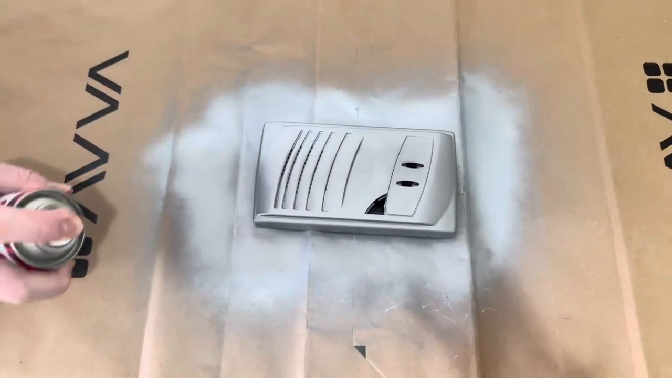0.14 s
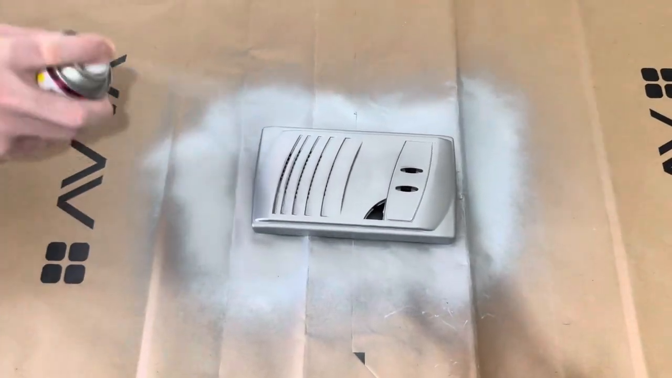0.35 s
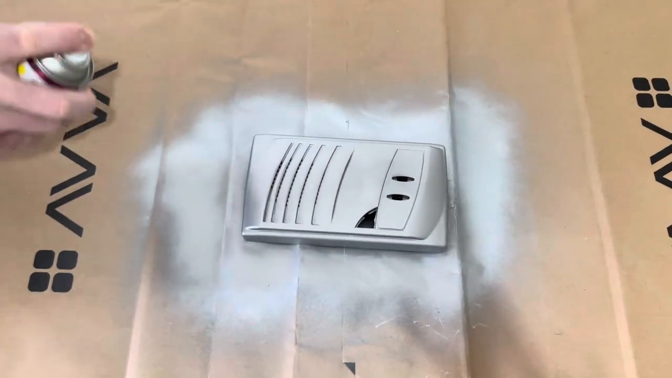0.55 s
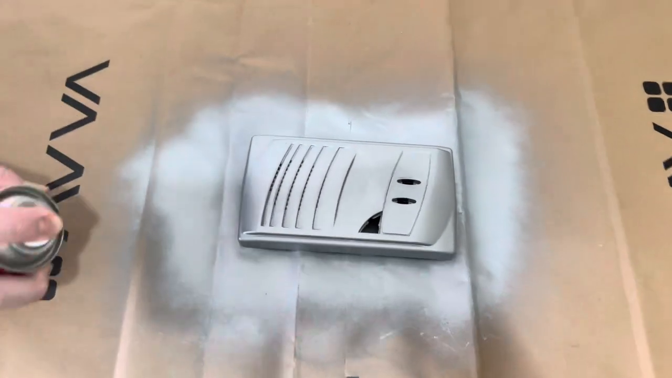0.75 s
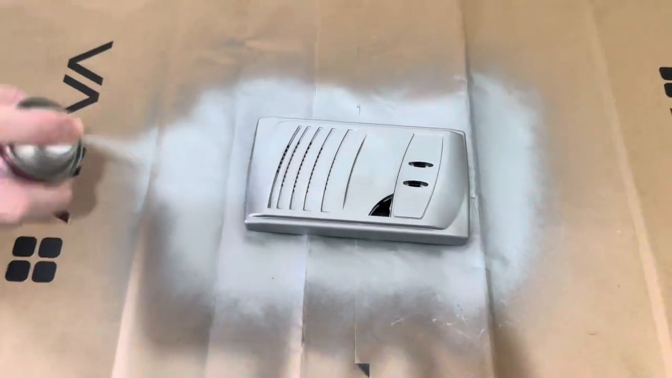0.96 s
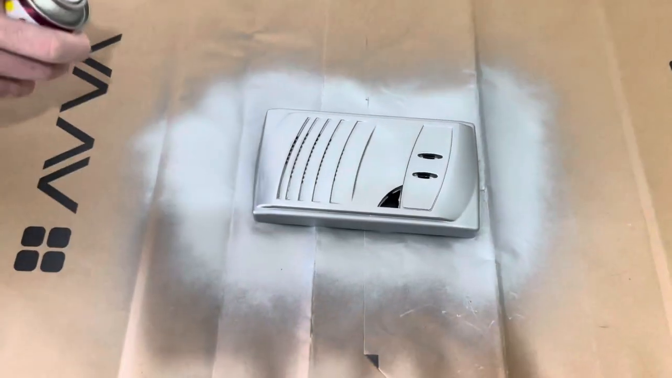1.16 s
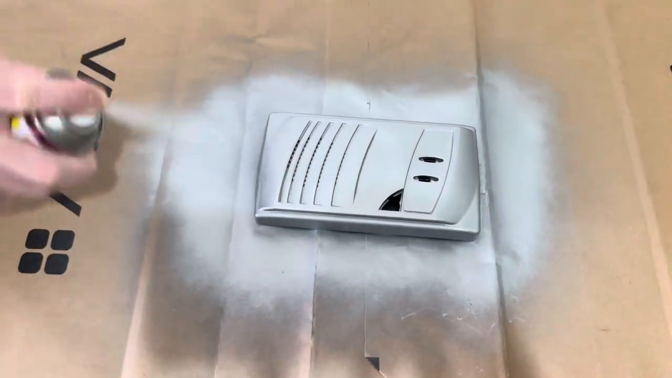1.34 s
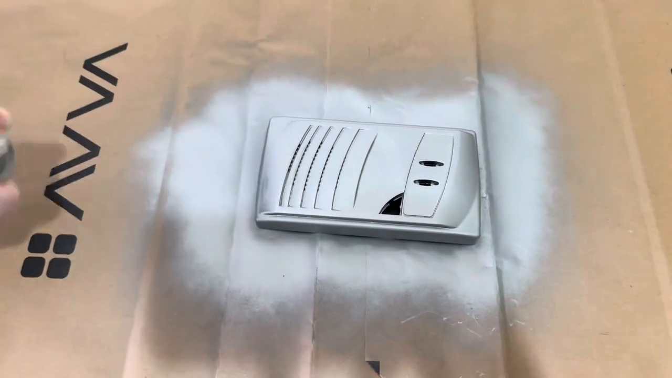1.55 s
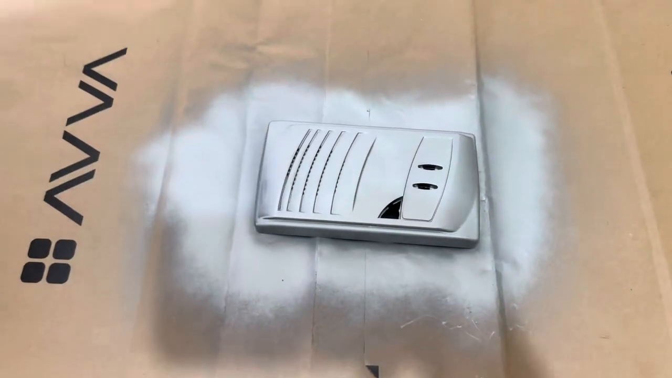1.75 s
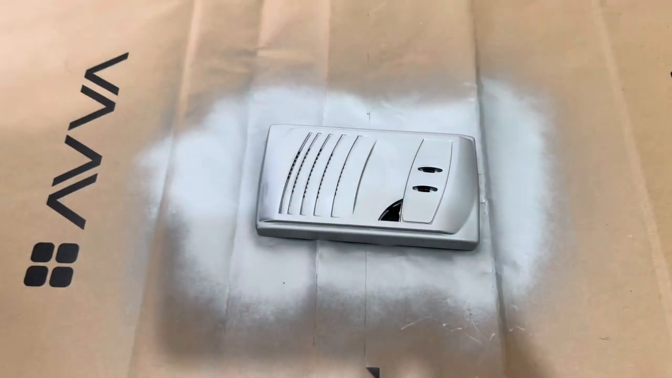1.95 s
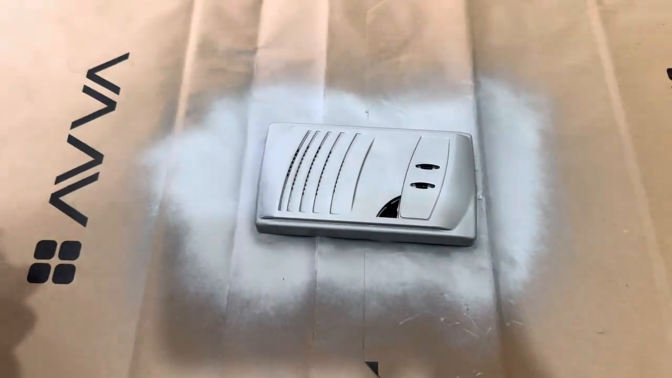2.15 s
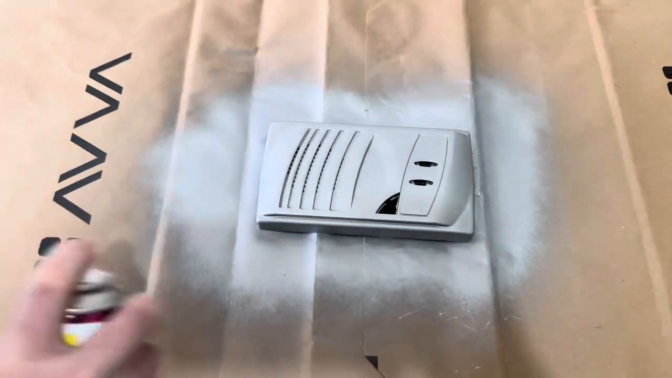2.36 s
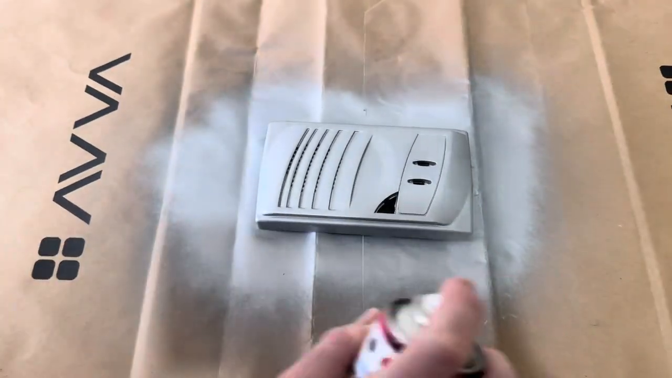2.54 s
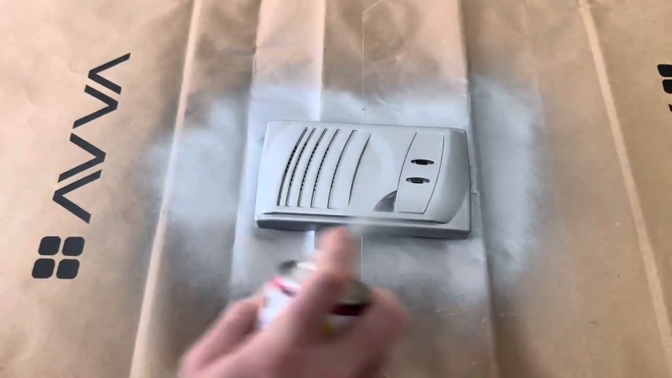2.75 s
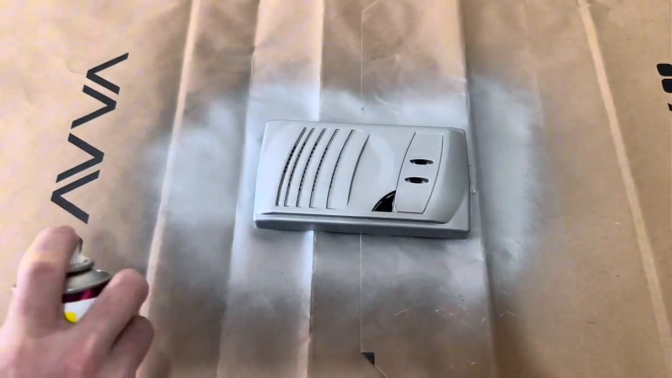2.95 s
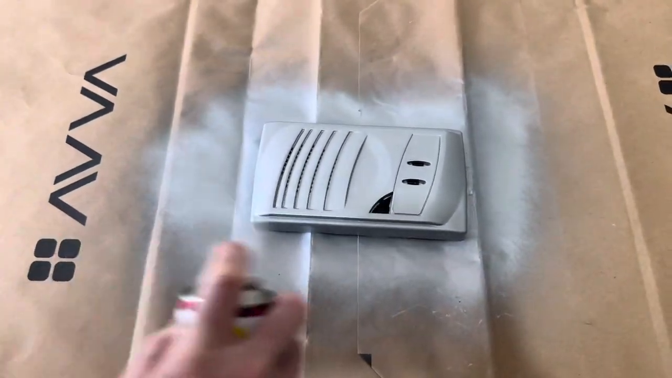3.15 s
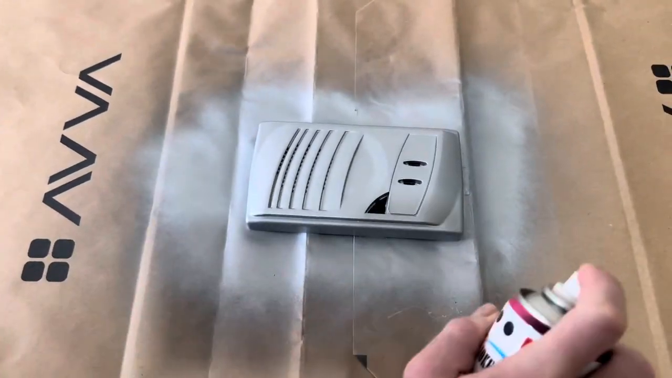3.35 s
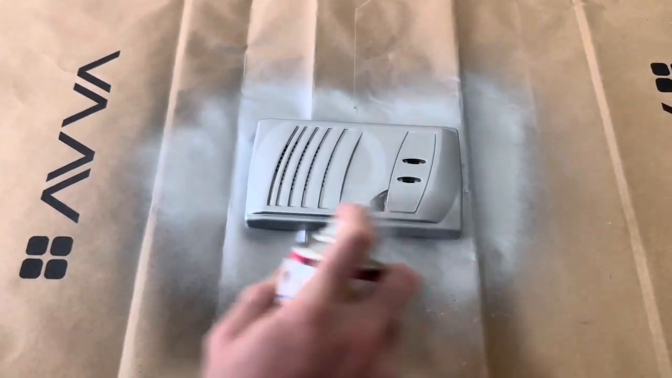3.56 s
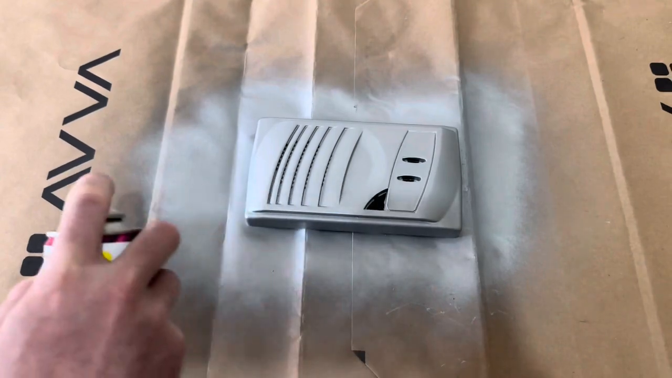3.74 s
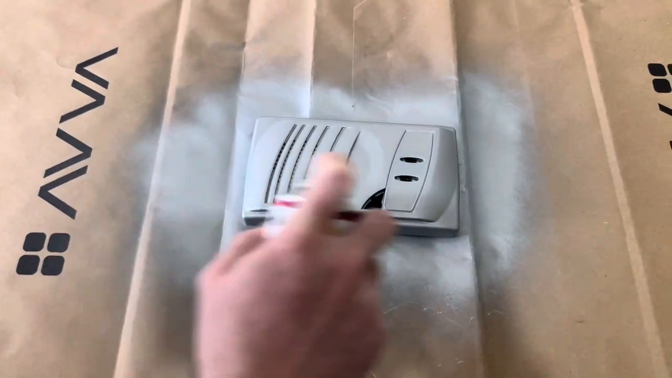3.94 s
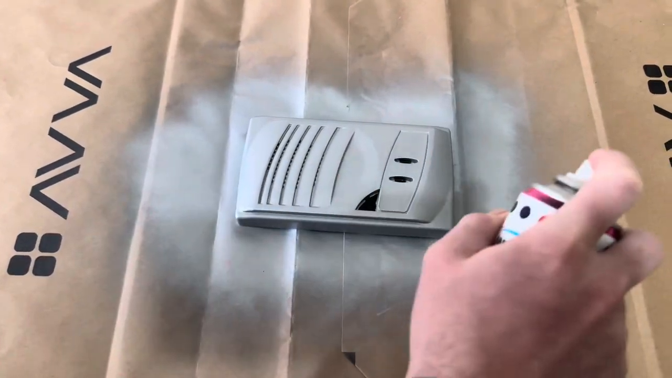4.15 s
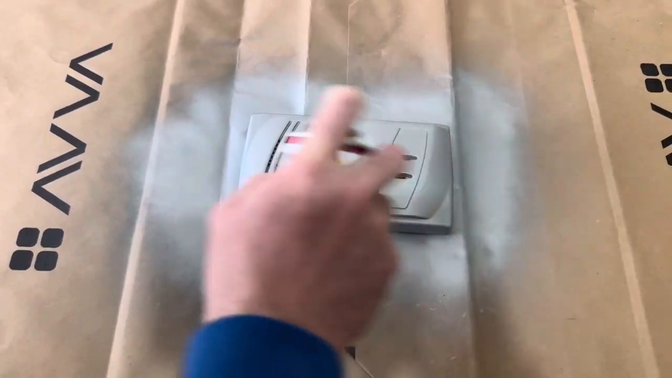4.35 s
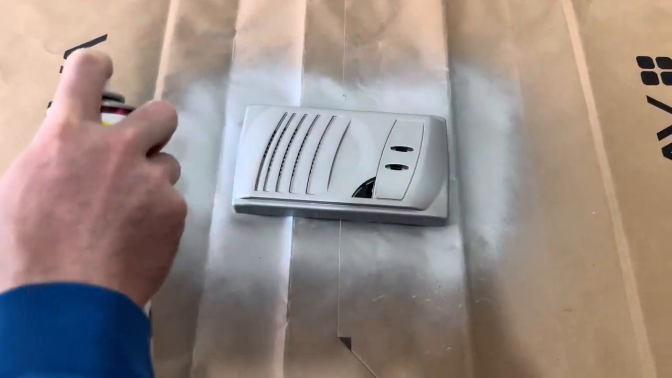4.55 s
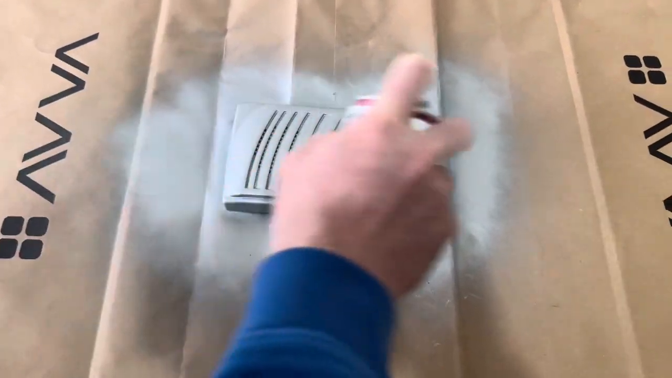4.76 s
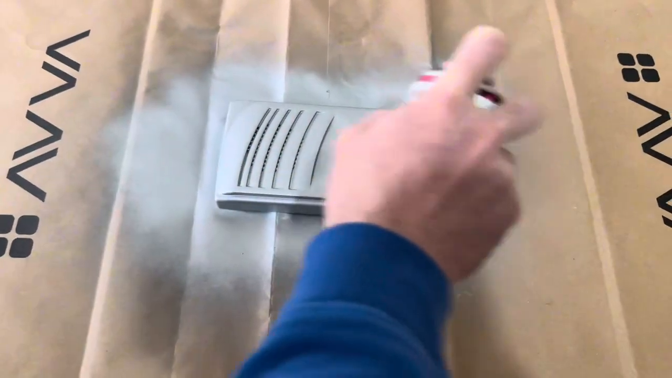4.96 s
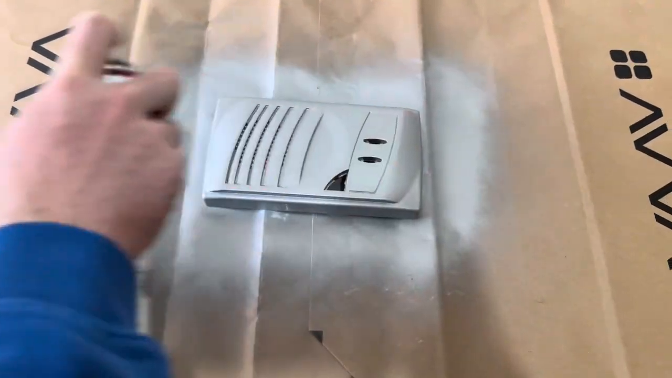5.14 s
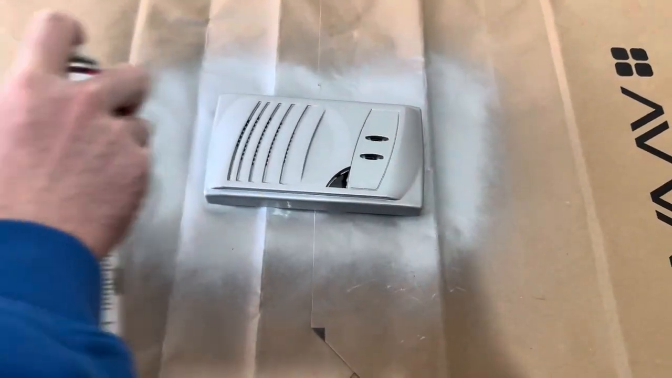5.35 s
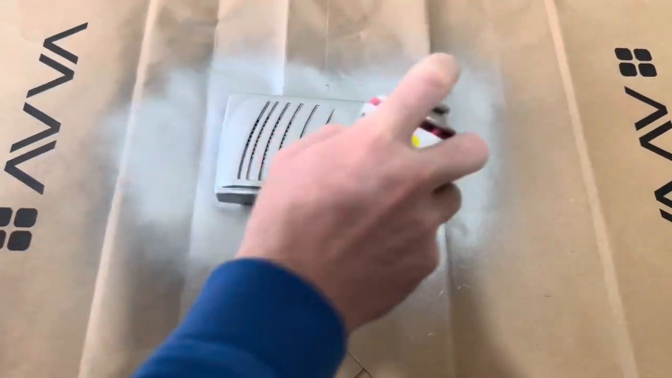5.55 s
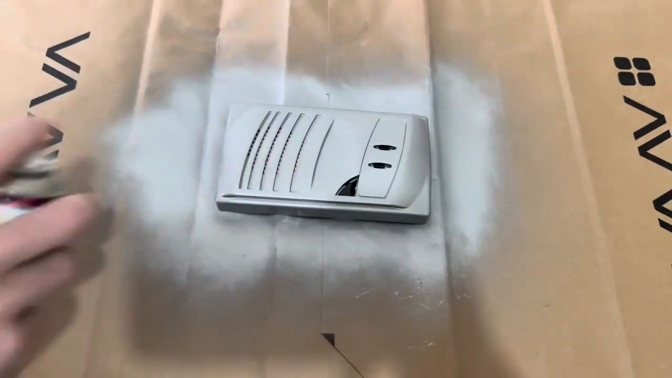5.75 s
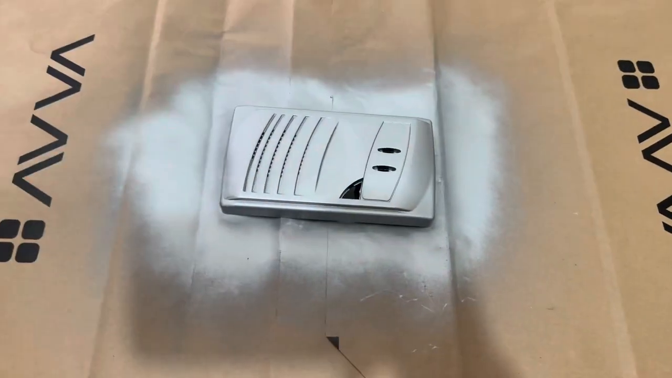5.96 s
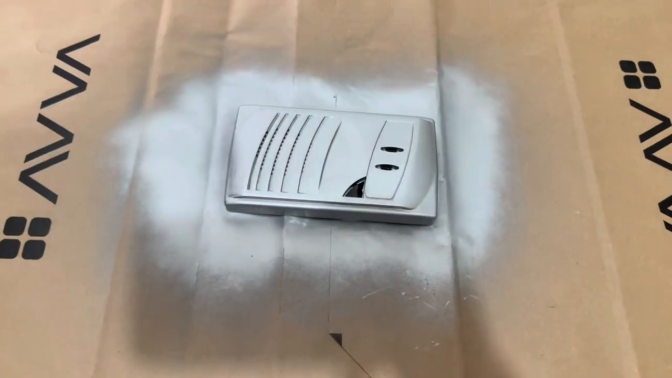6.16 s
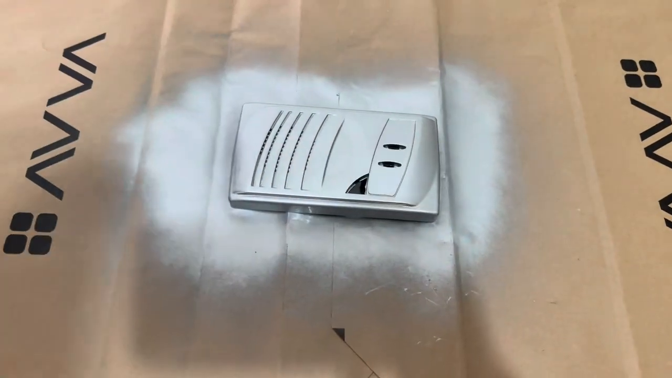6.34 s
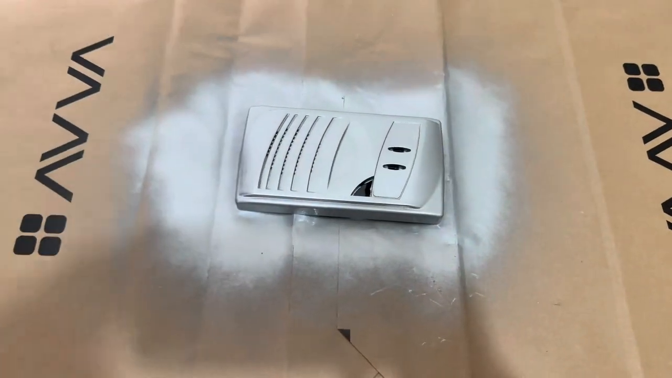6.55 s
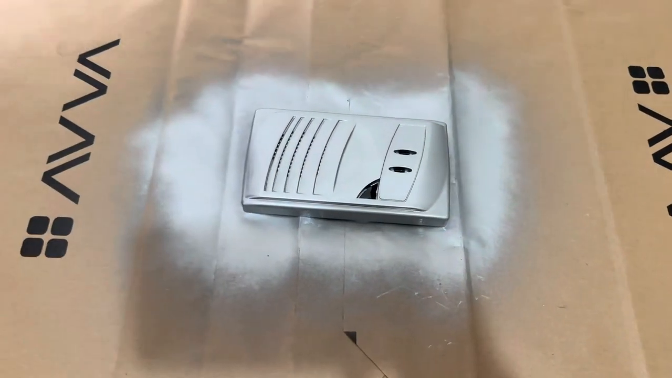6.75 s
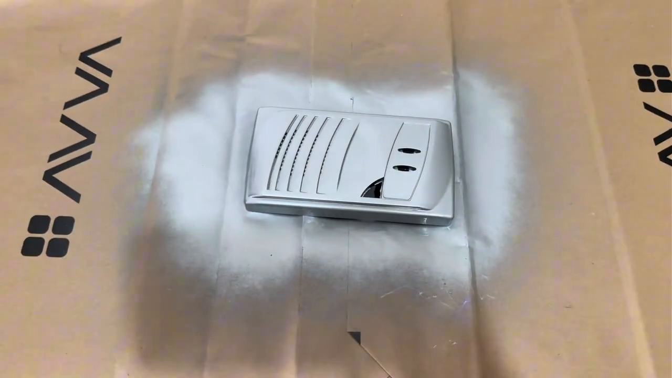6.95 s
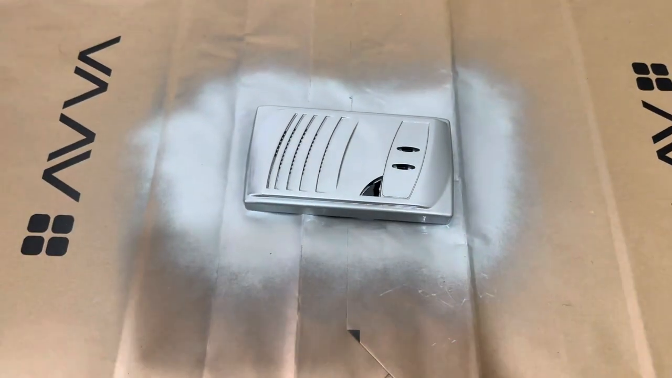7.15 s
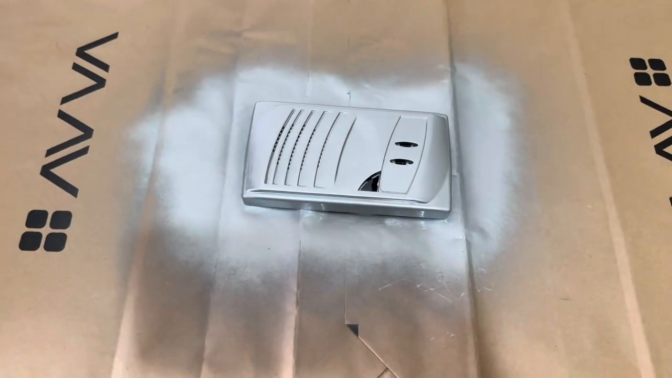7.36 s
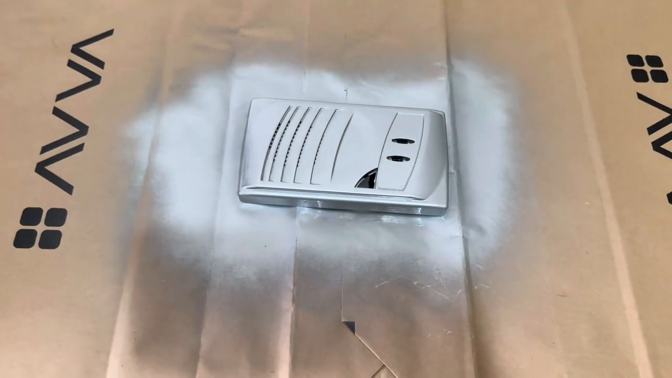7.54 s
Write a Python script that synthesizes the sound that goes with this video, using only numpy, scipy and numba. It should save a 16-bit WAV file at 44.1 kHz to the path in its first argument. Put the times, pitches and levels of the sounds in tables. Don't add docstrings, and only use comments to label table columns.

```python
import sys
import numpy as np
from scipy import signal
from scipy.fft import rfft, irfft, next_fast_len
from scipy.io import wavfile
from scipy.ndimage import uniform_filter1d, map_coordinates
from numba import njit

SR = 44100
rng = np.random.default_rng(int(sys.argv[2]) if len(sys.argv) > 2 else 0)


def attenuation_scalar(level_db):
    decades = np.asarray(level_db, float) / 20
    return 10 ** decades


def dump_mix(stems):
    frames = np.atleast_2d(stems).T
    limited = np.clip(frames, -1, 1)
    pcm = np.round(limited * 32767).astype(np.int16)
    wavfile.write(sys.argv[1], SR, pcm)


N = 335160

# f/Hz, level/dB
AIR_COLOUR = [(88, -46), (150, -16), (375, -12), (397, -32), (483, -24.5), (801, -18), (2840, -21.5),
              (3200, -27.5), (4910, -29.5), (15800, -34.5)]
# t/s, level/dB
HAND_LEVEL = [(0, -97), (.32, -77), (.8, -86), (1.08, -68), (1.25, -82), (2.05, -69), (2.23, -67),
              (2.5, -77.5), (3.09, -84.5), (3.39, -80.5), (3.6, -73), (5.08, -86), (5.21, -77), (5.48, -90),
              (5.7, -68.5), (5.9, -85), (6.4, -84.5), (7.45, -67)]
# f/Hz, level/dB
HAND_COLOUR = [(12, -36.5), (20, -10), (53, 3.5), (102, -13), (232, -6.5), (362, -15), (500, -14.5),
               (650, -24.5), (1100, -120)]
# f/Hz, time/s
ECHO_TIME = [(100, 0.78), (500, 0.23), (1500, 0.38), (5000, 0.35), (14000, 0.12)]
# f/Hz, level/dB
ECHO_LEVEL = [(100, -10.5), (1000, 2.5), (5000, -2.5), (14000, 2)]
# f/Hz, level/dB
BUMP_COLOUR = [(47, -39.5), (80, -10), (236, 1.5), (995, -14), (1100, -18), (1580, -19), (1720, -16),
               (2500, -19), (3250, -57), (5500, -120)]
# t/s, peak level/dB
BUTTON_TICKS = [
    (0.831, -40),
    (0.952, -45.5),
]
# t/s, length/s, level/dB, bottom dome over it/dB, side wall note over it/dB
ROLLS = [(1.616, 0.14, -55.5, -39, -31), (1.822, .05, -57, -28, -1), (1.878, 0.099, -52, -41, -29),
         (1.987, .04, -58.5, -31, -28), (2.025, .012, -57, -22, -22), (5.56, 0.2, -54, -17, -36),
         (5.853, 0.064, -75, -22.5, -15), (6.326, 0.04, -72.5, -7, 0), (6.522, 0.091, -68.5, 0, 3.5),
         (6.808, 0.044, -71.5, -5, 4.5), (6.861, .045, -69.5, -14, -1), (6.985, 0.066, -62, -18, -5),
         (7.22, 0.046, -62.5, -6, 3), (7.29, 0.013, -54, -15, -9), (7.303, .045, -53.5, 7.5, -13),
         (7.369, .06, -53, -1.5, -15), (7.434, 0.061, -61.5, 4.5, 3), (7.555, 0.054, -47.5, -23, -7)]
# t/s, peak level/dB
KNOCKS = [(1.6205, -60), (1.6306, -46), (1.6816, -38.5), (1.82, -45.5), (1.833, -45), (1.845, -42),
          (1.855, -50), (1.8724, -32), (1.9068, -38), (1.9314, -43), (2.042, -36), (2.0505, -45),
          (2.0635, -51), (5.694, -37.5), (6.817, -59), (6.9869, -46), (7.016, -60), (7.217, -41.5),
          (7.2524, -45), (7.2878, -37.5), (7.3135, -31), (7.34, -49), (7.3657, -31.5), (7.551, -30.5),
          (7.5772, -45)]
# t/s, length/s, level/dB
TIPS = [
    (2.2, 0.35, -60.5),
    (5.98, 0.14, -66),
    (6.17, 0.15, -61.5),
    (7.1, 0.046, -63.5),
]
# t/s, length/s, level/dB, f/Hz
PINGS = [
    (7.176, .012, -63.5, 810),
    (7.275, .028, -59, 1126),
    (6.876, .04, -67, 1698),
    (6.997, 0.023, -67.5, 1753),
    (7.311, 0.031, -47.5, 850),
    (7.45, .02, -58.5, 860),
    (7.585, .015, -54, 1150),
]
# f/Hz, width/Hz, level/dB
CAN_WALL = [(1600, 150, -9), (2285, 170, -9), (2607, 260, -4), (3640, 720, -8.5), (3995, 150, -4),
            (4400, 340, -3), (4890, 440, -1.5), (5910, 360, -4.5), (6660, 580, -10.5), (8100, 700, -7),
            (8890, 510, -8.5), (9970, 980, -10.5), (14500, 2600, -14.5), (3320, 2100, -5), (5200, 3400, -9)]
# f/Hz, width/Hz, level/dB
CAN_DOME = [(515, 78, -4.5), (834, 250, 4.5), (1100, 350, 1.5)]
# f/Hz, width/Hz, level/dB
SIDE_NOTES = [(1720, 25, 0), (4480, 60, -7)]
# f/Hz, width/Hz, level/dB
PAINT_SLOSH = [(1427, 1230, 1.5), (2340, 1460, 2), (6070, 990, -8)]
# t/s, held/s, nozzle hiss/dB, landing roar/dB, cardboard thrum/dB
PUFFS = [(-.14, 0.13, -33, -47, -52.5), (0.247, .11, -35.5, -47, -60.5), (0.626, 0.098, -35, -43, -59.5),
         (.985, 0.095, -35, -45.5, -61.5), (1.345, 0.11, -35.5, -50.5, -59.5),
         (2.423, 0.13, -36.5, -45.5, -52.5), (2.782, 0.12, -35.5, -50, -57), (3.164, 0.13, -35.5, -52, -58),
         (3.533, .11, -35.5, -45.5, -64), (3.919, 0.13, -36.5, -45.5, -58),
         (4.298, 0.12, -36.5, -44.5, -65), (4.692, 0.13, -37, -48.5, -58.5),
         (5.041, 0.12, -37.5, -53.5, -57.5), (5.397, 0.13, -37, -51.5, -62)]
# t/s, boom of the gap f/Hz, landing later than usual/s, boom over the roar/dB
AIM = [(0, 1100, 0.01, -3.5), (.3, 1100, 0.019, 0), (.68, 1036, 0.0079, -2), (1.05, 1100, 0.026, -.5),
       (1.4, 1470, 0.002, 1), (2.48, 1025, 0.0065, -2.5), (2.85, 1050, -0.0066, -1),
       (3.23, 1170, -0.019, 0.5), (3.6, 1066, 0.0031, 2.5), (3.99, 1000, 0.0082, 5),
       (4.37, 1100, 0.0075, 2), (4.76, 1220, 0.0051, 0.5), (5.1, 1390, 0.00076, 1), (5.45, 1100, 0.01, -4)]
# f/Hz, level/dB
HISS_COLOUR = [(880, -26.5), (1500, -13.5), (2180, -7.5), (2850, -13.5), (5090, -5.5), (7040, -4.5),
               (10000, -3), (11100, -3.5), (14500, -4), (15800, -9)]
# f/Hz, level/dB
ROAR_COLOUR = [(150, -27), (250, -15.5), (439, -2.5), (646, -7), (941, -6.5), (1210, -11), (2200, -10),
               (2750, -7.5), (3500, -17.5), (4550, -63), (7700, -120)]
# f/Hz, width/Hz, level/dB
CARDBOARD = [(53.7, 6.3, -0.5), (129.3, 18.7, 1), (225.6, 30, -2.5), (300.5, 67, -6)]
# t/s, length/s, level/dB
PANEL_HITS = [
    (.27, 0.12, -60.5),
    (1.0, 0.12, -56.5),
]
# f/Hz, width/Hz, level/dB
LOOSE_PANEL = [(221.7, 13, -4), (445, 24.5, -17)]
# f/Hz, level/dB
WIDTH = [(60, -2), (250, -7), (450, 0.5), (9000, 2), (11800, -1)]
# f/Hz, level/dB
OVERALL_TONE = [(10200, 1), (10600, 1.5), (11250, -12.5), (11900, 0.5), (12300, -1), (15850, 5.5), (16050, -70.5)]


def unit(x):
    return x / np.sqrt(np.mean(x ** 2))


def noise(rows=2, length=N):
    return rng.standard_normal((rows, length))


def at(table, hz):
    f, v = np.transpose(table)
    return np.interp(np.log(np.maximum(hz, 1)), np.log(f), v)


def walk(rate):
    hold = int(SR / rate)
    levels = rng.standard_normal(N // 64)[:N // hold + 1]
    return 0.91 * uniform_filter1d(np.repeat(levels, hold)[:N], hold)


def colour(x, spectrum):
    n = next_fast_len(x.shape[-1])
    gain = attenuation_scalar(at(spectrum, np.arange(n // 2 + 1) * SR / n))
    return irfft(rfft(x, n) * gain, n)[..., :x.shape[-1]]


def patchy(x, spectrum, patchy_db, patch_s, patch_hz):
    f, t, z = signal.stft(x, SR, nperseg=512)
    grid = rng.standard_normal((128, 512))
    where = np.meshgrid(f / patch_hz, t / patch_s, indexing="ij")
    patches = map_coordinates(grid, where, order=1, mode="wrap")
    db = at(spectrum, f)[:, None] + patchy_db * patches
    return signal.istft(z * attenuation_scalar(db), SR, nperseg=512)[1][:, :N]


def body(modes):
    t = np.arange(SR // 4)[:, None] / SR
    hz, wide, db = np.transpose(modes)
    strength = (-1) ** np.arange(len(modes)) * attenuation_scalar(db) * np.sqrt(wide)
    h = (strength * np.exp(-np.pi * wide * t) * np.cos(2 * np.pi * hz * t)).sum(axis=1)
    return h / np.sqrt(np.sum(h ** 2))


def ring(x, modes):
    return signal.oaconvolve(x, body(modes)[None, :8192], axes=1)[:, :N]


@njit
def hollow(x, hz, q):
    y, band, low = np.empty(len(x)), 0., 0.
    for i in range(len(x)):
        g = np.tan(np.pi * hz[i] / SR)
        v = (band + g * (x[i] - low)) / (1 + g * (g + 1 / q))
        band, low, y[i] = 2 * v - band, low + 2 * g * v, v / q
    return y


def grains(rate, spread_db):
    hit = rng.random(N) < rate / SR
    return hit * rng.standard_normal(N) * attenuation_scalar(spread_db * np.minimum(rng.exponential(size=N), 3))


def swell(rows, short_db, open_s, knee_s, fall_db_s):
    since = np.arange(0, N + 64, 32)[:, None] / SR - np.array(rows)[:, 0]
    length, db = np.array(rows)[:, 1:3].T
    approach = short_db * np.exp(np.minimum(-since / open_s, 4))
    fall = fall_db_s * knee_s * np.logaddexp(0, (since - length) / knee_s)
    db = db - approach - fall
    step = np.arange(N) / 32
    level = np.interp(step, np.arange(len(db)), np.maximum(db.max(axis=1), -130))
    return level, db.argmax(axis=1)[step.astype(int)]


def place(x, pan_db, apart):
    right = np.sqrt(1 - apart) * x[0] + np.sqrt(apart) * x[1]
    return np.array([x[0] * attenuation_scalar(pan_db / 2), right * attenuation_scalar(-pan_db / 2)])


def air():
    still = unit(colour(noise(), AIR_COLOUR)) * attenuation_scalar(-80)
    hand_db = np.interp(np.arange(N) / SR, *np.transpose(HAND_LEVEL)) + 6.4 * walk(6.4)
    hand = unit(colour(noise(), HAND_COLOUR)) * attenuation_scalar(hand_db)
    return place(still, 0, apart=0.73) + place(hand, 0, apart=0.92)


def room(x):
    f, t, z = signal.stft(noise(2, SR // 2), SR, nperseg=512)
    t60 = at(ECHO_TIME, f)[:, None]
    fade = attenuation_scalar(at(ECHO_LEVEL, f)[:, None] - 60 * t / t60)
    fade = fade / np.sqrt(t60 * SR / (2 * np.log(1000)))
    tail = signal.istft(z * fade, SR, nperseg=512)[1]
    tail = tail * np.minimum(np.arange(tail.shape[1]) / SR / 0.0036, 1)
    return signal.fftconvolve(x.mean(axis=0, keepdims=True), tail, axes=1)[:, :N]


def thump():
    start, rise_s, fall_s = int(6.534 * SR), 0.011, 0.039
    out, t = np.zeros((2, N)), np.arange(SR // 2) / SR
    push = (1 - np.exp(-t / rise_s)) * np.exp(-t / fall_s)
    bump = place(unit(colour(noise(2, SR // 2), BUMP_COLOUR)), 0, apart=0.4)
    out[:, start:start + SR // 2] = attenuation_scalar(-57) * push / push.max() * bump
    return out


def button_ticks():
    out, t = np.zeros((2, N)), np.arange(512) / SR
    band = signal.butter(1, [700, 5000], "band", fs=SR)
    for s, db in BUTTON_TICKS:
        tick = signal.lfilter(*band, noise(2, 512) * np.exp(-t / 0.0011))
        start = int(s * SR)
        out[:, start:start + 512] += attenuation_scalar(db - 5.0) * tick / np.abs(tick).max()
    return out


def ball_knocks():
    out, t = np.zeros((2, N)), np.arange(256) / SR
    can = body(CAN_WALL)[None, :2048]
    for s, db in KNOCKS:
        start = int(s * SR)
        contact = noise(2, 256) * np.sqrt(t) * np.exp(-t / 0.0024)
        knock = signal.fftconvolve(contact, can, axes=1)[:, :N - start]
        out[:, start:start + knock.shape[1]] += attenuation_scalar(db - 10.5) * knock / np.std(knock[:, :200])
    return out


def ball_rolling():
    roll_db, turn = swell(ROLLS, short_db=5, open_s=0.0074, knee_s=0.005, fall_db_s=455)
    tip_db, _ = swell(TIPS, short_db=9.1, open_s=0.09, knee_s=0.016, fall_db_s=130)
    rolling, tipping = attenuation_scalar(roll_db), attenuation_scalar(tip_db)
    dome_db, side_db = np.array(ROLLS)[turn, 3:].T
    bumps = unit(grains(700, spread_db=3.5)) * np.sign(noise())
    touch = unit((bumps + 1.1 * noise()) * attenuation_scalar(1.66 * walk(90)))
    wall = ring(touch * (rolling + tipping * attenuation_scalar(-16)), CAN_WALL)
    dome = ring(touch * (rolling * attenuation_scalar(dome_db) + tipping * attenuation_scalar(-11)) * attenuation_scalar(-5.5), CAN_DOME)
    side = ring(touch * rolling * attenuation_scalar(side_db - 9.5), SIDE_NOTES)
    slosh = ring(noise(), PAINT_SLOSH) * (rolling * attenuation_scalar(-8.5) + tipping) * attenuation_scalar(-2.5)
    mix = wall + dome + side + slosh
    for ping in PINGS:
        ping_db, _ = swell([ping], short_db=4, open_s=0.004, knee_s=0.003, fall_db_s=900)
        mix = mix + ring(touch * attenuation_scalar(ping_db), [(ping[3], 25, 0)])
    return mix


def ball():
    return place(ball_knocks() + ball_rolling(), 3.5, apart=0.95)


def nozzle_hiss(gust, since_s):
    gas = noise() * attenuation_scalar(0.61 * walk(300) + gust)
    sputter = gas + 0.2 * unit(grains(2800, spread_db=-4.5))
    hiss = unit(patchy(sputter, HISS_COLOUR, patchy_db=4.5, patch_s=0.07, patch_hz=200.9))
    t = np.arange(N) / SR
    detour_s = 0.0022 + 0.006 * np.clip(since_s, 0, 0.4)
    mirrored = np.array([np.interp(t - detour_s, t, port) for port in hiss])
    return unit(hiss + attenuation_scalar(-7) * mirrored)


def landing_roar(gust, landed, short_of_full_db):
    t = np.arange(N) / SR
    aim_s, aim_hz, _, gap_db = np.transpose(AIM)
    times_and_roar = landed[:, [0, 1, 3]]
    roar_db, _ = swell(times_and_roar, short_db=9.8, open_s=0.012, knee_s=0.045, fall_db_s=272)
    boom_db, _ = swell(times_and_roar, short_db=18.7, open_s=0.021, knee_s=0.02, fall_db_s=210)
    boom_db = boom_db + np.interp(t, aim_s, gap_db)
    boom_hz = np.interp(t, aim_s, aim_hz) * (1 + 0.005 * np.clip(short_of_full_db, 0, 40))
    splash = unit(colour(noise() * attenuation_scalar(6.6 * walk(60) + 0.6 * gust), ROAR_COLOUR))
    boom = np.array([hollow(port, boom_hz, 3.5) for port in splash])
    return 0.71 * splash * attenuation_scalar(roar_db) + 1.335 * attenuation_scalar(boom_db) * boom


def cardboard_thrum(landed):
    thrum_db, _ = swell(landed[:, [0, 1, 4]], short_db=9.9, open_s=0.0085, knee_s=0.011, fall_db_s=144)
    panel_db, _ = swell(PANEL_HITS, short_db=12, open_s=0.044, knee_s=0.0089, fall_db_s=210)
    sheet = ring(noise(), CARDBOARD) * attenuation_scalar(thrum_db - 2.0)
    return sheet + ring(noise() * attenuation_scalar(panel_db), LOOSE_PANEL)


def spray():
    puffs = np.array(PUFFS)
    hiss_db, puff = swell(puffs, short_db=10.04, open_s=0.019, knee_s=0.006, fall_db_s=461)
    since_s = np.arange(N) / SR - puffs[puff, 0]
    hiss_db = hiss_db + 1499 * np.minimum(since_s + 0.0035, 0)
    flight_s = np.array(AIM)[:, 2]
    landed = puffs + np.outer(flight_s, [1, -1, 0, 0, 0])
    pan_db = 0.3 + 3.2 * np.exp(-np.maximum(since_s, 0) / 0.14)
    gust = walk(40)
    hiss = place(nozzle_hiss(gust, since_s), pan_db, apart=0.76) * attenuation_scalar(hiss_db)
    roar = place(landing_roar(gust, landed, puffs[puff, 2] - hiss_db), pan_db, apart=0.99) * attenuation_scalar(-0.5)
    return hiss + roar + place(cardboard_thrum(landed), 0, apart=0.33)


def scene():
    dry = thump() + button_ticks() + ball() + spray()
    return dry + room(dry) + air()


def band_limit(x):
    return signal.sosfilt(signal.butter(12, 16950, fs=SR, output="sos"), x)


def record(dry):
    mid = (dry[0] + dry[1]) / 2
    side = colour((dry[0] - dry[1]) / 2, WIDTH)
    ports = np.array([np.roll(mid + side, 3), mid - side])
    mix = colour(ports, OVERALL_TONE)
    return band_limit(mix)


dry = scene()
out = record(dry)
dump_mix(out)
```